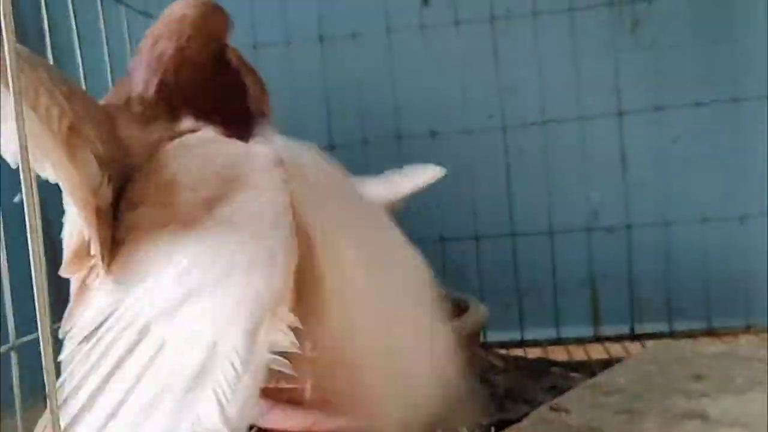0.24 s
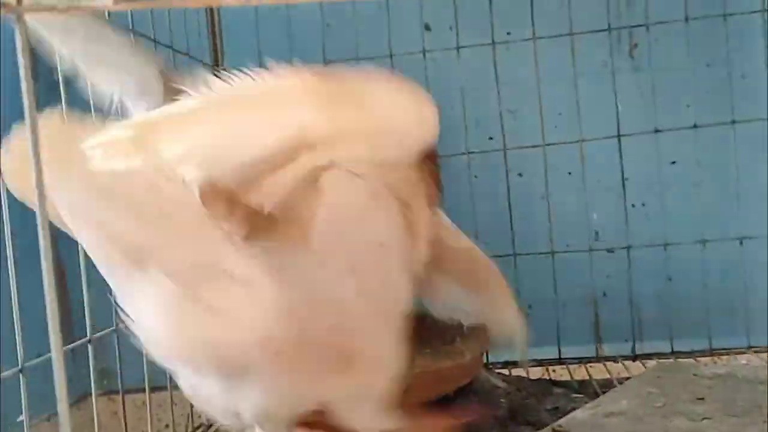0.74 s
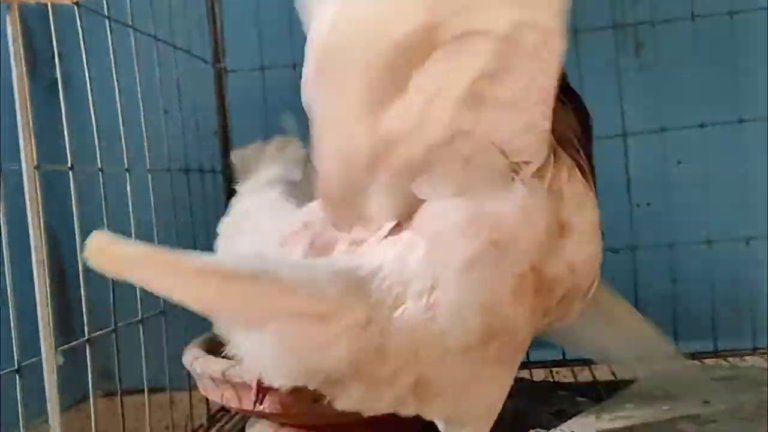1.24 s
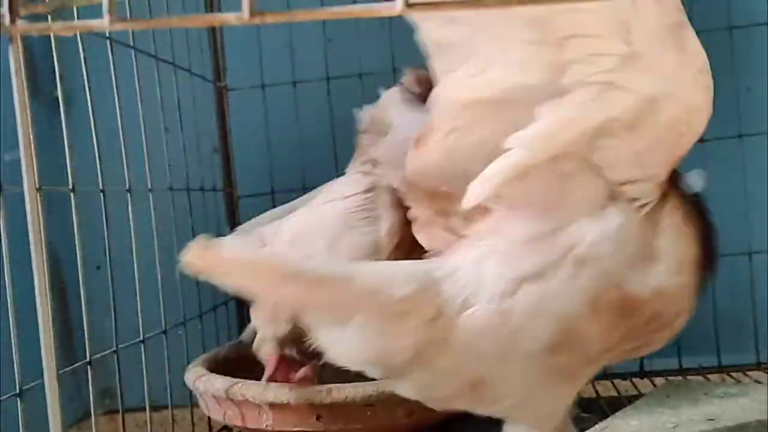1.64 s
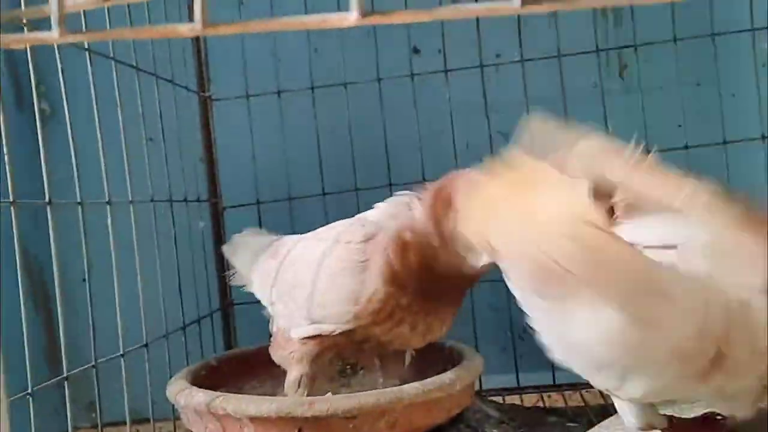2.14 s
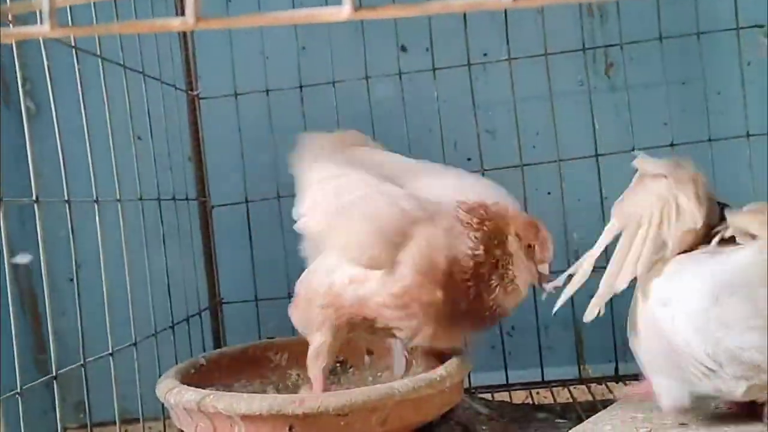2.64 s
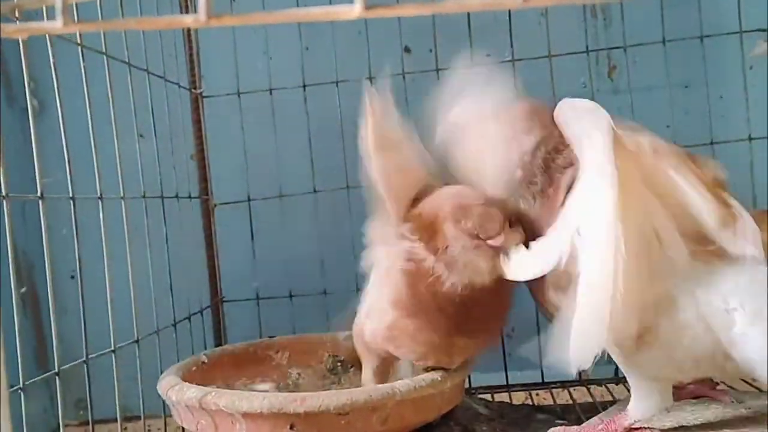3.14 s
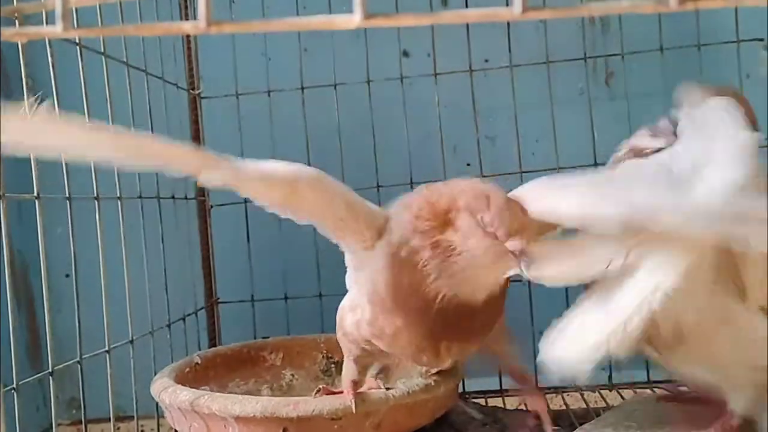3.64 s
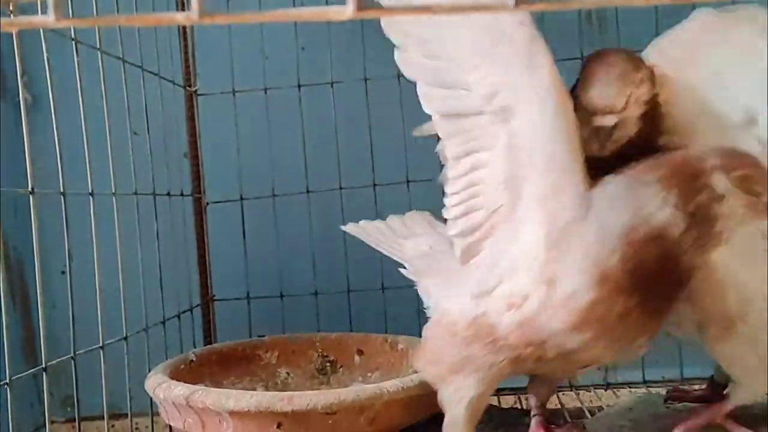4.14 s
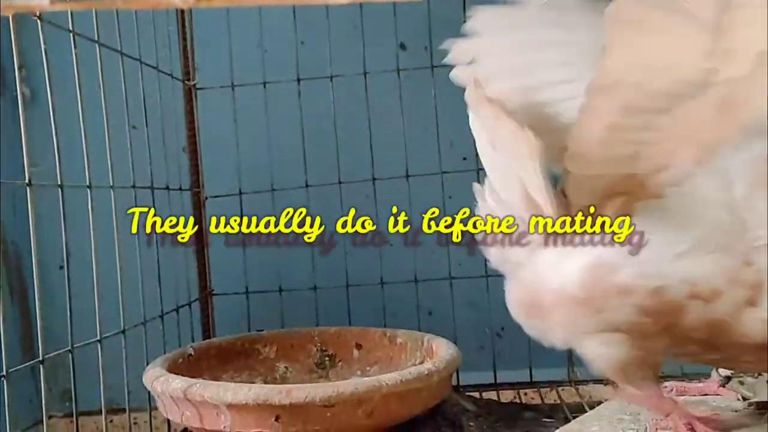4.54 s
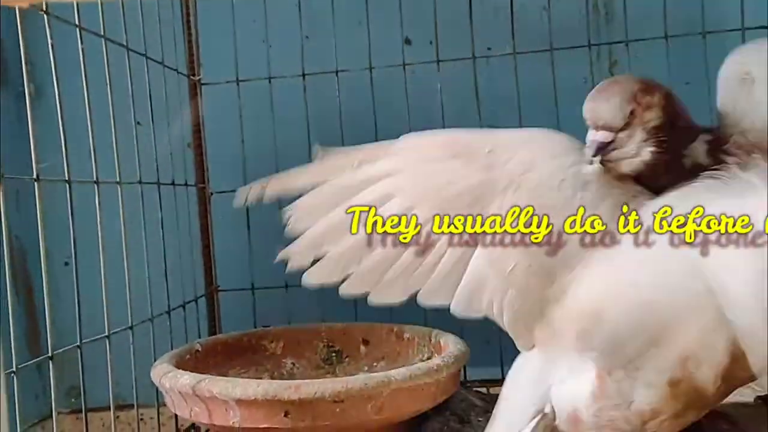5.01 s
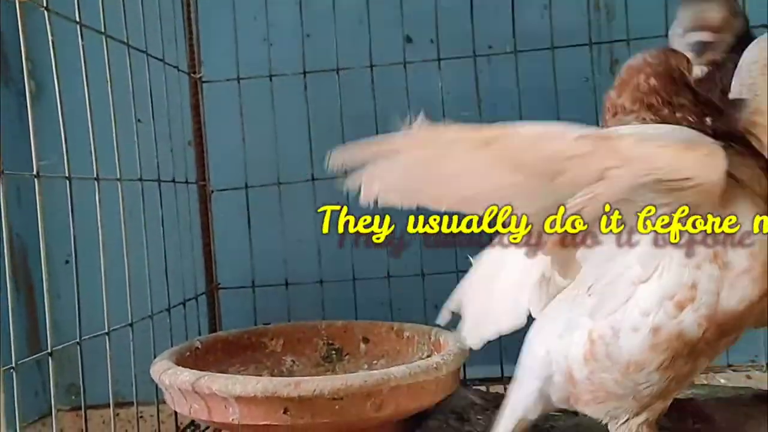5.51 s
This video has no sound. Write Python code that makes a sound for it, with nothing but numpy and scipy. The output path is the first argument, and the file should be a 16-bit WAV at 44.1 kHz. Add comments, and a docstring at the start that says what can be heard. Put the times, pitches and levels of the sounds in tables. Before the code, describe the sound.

Feathers whoosh, crack and rattle as fighting pigeons give low grunting coos and throaty pulses in a murmuring pigeon loft.

```python
"""In a pigeon loft, at a wire cage: two pigeons scuffle, with a small stereo microphone that cuts the bass.
Foreground: both coo in throbbing near-sine notes, with short two-tone throat pulses between and over them.
Wings swish, slap and rattle in shaped noise, scrapes ring the wire, and narrow noise squeaks.
Around them the loft murmurs in short random coos and banded noise; far off a thin whistle comes and goes.
Feedback delays give the room, and slaps puff low noise on the microphone ports."""
import sys
import numpy as np
from scipy import signal
from scipy.io import wavfile

SR = 44100
rng = np.random.default_rng(int(sys.argv[2]) if len(sys.argv) > 2 else 0)


def waveform_to_disk(signal):
    """Save audio, clipped to [-1, 1], as 16-bit WAV at the path in sys.argv[1]."""
    frames = np.transpose(np.atleast_2d(signal))
    scaled = np.clip(frames, -1, 1) * 32767
    samples = np.round(scaled).astype(np.int16)
    wavfile.write(sys.argv[1], SR, samples)


N = 254236
TIME = np.arange(N) / SR

# Coo notes of each bird; pitch glides fast at first, level slides evenly in dB:
# (start t/s, length t/s, start f/Hz, end f/Hz, start level/dB, end level/dB)
LOW_BIRD_NOTES = [(0.3, 0.13, 341, 335.3, -41.5, -41), (0.735, 0.17, 352.9, 291.6, -34, -35.5),
                  (0.95, 0.25, 325.2, 327, -42, -32), (1.16, .23, 344.4, 343.4, -36, -37.5),
                  (2.17, 0.13, 352.6, 296, -26.5, -24), (2.375, 0.4, 296, 336.3, -31, -40),
                  (3.52, 0.13, 367.7, 370.8, -43, -43.5), (3.89, 0.091, 341.2, 337.2, -35, -33.5),
                  (4.0, 0.15, 359.2, 350.6, -37, -35.5), (4.19, 0.1, 331.7, 345.7, -29.5, -36.5),
                  (4.585, 0.087, 356, 347, -28.5, -34), (4.69, 0.031, 306.5, 294, -32, -27.5),
                  (4.75, 0.097, 340, 346.3, -33.5, -31.5), (4.965, 0.081, 356.9, 341.6, -28, -31),
                  (5.075, 0.085, 325.3, 327.6, -36.5, -38.5), (5.42, 0.27, 361, 341.7, -40, -35.5)]
HIGH_BIRD_NOTES = [(0, 0.064, 415.4, 395.5, -38, -42), (1.11, 0.028, 509.4, 498, -43.5, -34),
                   (2.38, .1, 448.6, 420, -38, -41.5), (2.62, 0.19, 357, 436, -27.5, -53),
                   (3.715, 0.14, 426.6, 414.6, -35, -35.5), (4.025, 0.12, 431.8, 411, -30.5, -37),
                   (4.94, 0.18, 499.2, 390, -33, -36), (5.14, 0.087, 395, 455, -35.5, -32.5),
                   (5.27, .09, 432, 420.7, -50, -33.5), (5.44, .13, 419.8, 413.4, -34.5, -34.5)]
# Sudden swells of each bird's throat: (t/s, peak level/dB)
LOW_BIRD_SWELLS = [(0.943, -30), (1.007, -29), (1.066, -24), (1.152, -26.5), (2.248, -20), (2.505, -22),
                   (2.619, -26), (4.639, -25), (5.02, -26.5)]
HIGH_BIRD_SWELLS = [(4.13, -33), (4.971, -27.5), (5.284, -30.5)]
# How broken the low bird's note is: (t/s, roughness [0-1])
LOW_BIRD_ROUGHNESS = [(2.1, .45), (2.16, .15), (2.33, .15), (2.37, .7), (4.5, .45), (4.6, .35), (4.9, .45)]
# Short two-tone throat pulses, some between coos and some over them:
# (t/s, peak level/dB of the lower tone, lower tone f/Hz, upper tone level/dB against the lower)
THROAT_PULSES = [(1.213, -28, 296, -2), (1.457, -36.5, 315.4, 7), (1.65, -32, 297.7, 0),
                 (1.706, -22.5, 307, -4), (1.778, -25.5, 301, 5), (1.857, -26.5, 306.5, 6),
                 (1.959, -25.5, 308, -10), (2.012, -31, 349, 0.5), (3.199, -28, 338, -13),
                 (3.302, -29.5, 353, -9), (3.665, -29.5, 333, -8), (5.488, -32, 317, 10),
                 (5.65, -33.5, 318.2, 6.5)]
# Wing strokes sweeping the air: (peak t/s, peak level/dB, swell time constant t/s, fade time constant t/s)
WING_STROKES = [(0.041, -41.5, 0.009, 0.09), (0.12, -42, 0.088, 0.045), (0.27, -48, 0.05, 0.13),
                (0.421, -37, 0.014, 0.089), (0.743, -42, 0.041, 0.062), (0.898, -51, 0.095, 0.11),
                (1.077, -46.5, 0.011, 0.069), (1.327, -42.5, 0.031, 0.096), (1.88, -53.5, 0.23, 0.079),
                (2.392, -40.5, 0.037, 0.077), (2.917, -40, 0.071, 0.038), (3.083, -47.5, 0.006, 0.19),
                (3.179, -46, 0.016, 0.25), (3.26, -45, .005, 0.054), (3.362, -45.5, 0.012, 0.079),
                (3.637, -42, 0.022, 0.032), (3.79, -44.5, 0.015, 0.16), (4.19, -51, 0.0084, 0.12),
                (4.3, -43.5, 0.029, 0.1), (4.416, -46.5, 0.029, 0.11), (4.552, -40, 0.0084, 0.088),
                (4.774, -53, 0.06, 0.34), (5.044, -46, 0.02, 0.05)]
# Wing slaps: (t/s, crack level/dB, body resonance f/Hz, body level/dB)
WING_SLAPS = [(0.0345, -37.5, 1380, -45), (0.415, -42, 1870, -43.5), (0.5, -44, 1536, -33),
              (0.7368, -47, 1093, -34.5), (0.8945, -41, 754, -61), (1.075, -40.5, 1840, -42.5),
              (1.37, -41, 1734, -37.5), (1.4536, -47, 1230, -48.5), (1.573, -41, 1012, -43),
              (2.071, -36.5, 2600, -48), (2.135, -46, 817, -38), (2.1871, -64, 1480, -43),
              (2.3443, -44, 2179, -45.5), (2.385, -41.5, 825, -48), (2.5823, -32.5, 1760, -38.5),
              (2.7156, -40.5, 830, -37.5), (3.1775, -39.5, 673, -26), (3.202, -45, 1840, -36),
              (3.255, -36.5, 854, -37), (3.3559, -39, 1123, -34), (3.426, -35.5, 1770, -40),
              (3.441, -39, 538, -33.5), (3.791, -38, 2710, -42), (3.9386, -36, 1994, -46.5),
              (4.411, -43, 1543, -38.5), (4.5531, -37, 2880, -42), (5.5765, -38, 1683, -39.5),
              (5.671, -41.5, 839, -44)]
# Tone colour of the feather noise: (f/Hz, relative level/dB per Hz)
FEATHER_SPECTRUM = [(400, -49), (700, 1), (2000, -1.5), (4800, -6.5), (5900, -6), (6850, 3), (10000, -13),
                    (16000, -7.5)]
# Modes of the cage wire: (f/Hz, level/dB)
WIRE_MODES = [(3900, -6), (5250, -8), (6620, 1), (7350, -4)]
# A claw or quill drags over the wire: (t/s, peak level/dB of the driving noise)
WIRE_DRAGS = [(0.242, -43.5), (1.45, -47)]
# Narrow squeaks in the scuffle: (start t/s, fall time t/s, f/Hz, level/dB before fading)
SCUFFLE_SQUEAKS = [(0.762, 0.043, 3120, -50), (3.292, 0.022, 1600, -35.5), (4.071, 0.022, 2330, -45.5),
                   (4.551, 0.037, 3080, -40), (5.309, 0.16, 741, -43)]
# Tone colour of the loft murmur: (f/Hz, relative level/dB per Hz)
LOFT_SPECTRUM = [(200, -34), (280, -22.5), (370, 7.5), (660, -8), (1000, -13), (1400, -17), (3900, -29),
                 (4900, -41), (7000, -32), (10000, -41.5), (16000, -45)]
# Far thin whistle: (start t/s, end t/s, f/Hz)
FAR_WHISTLES = [(1, 1.309, 3940), (2.177, 2.543, 4075), (2.952, 3.158, 3970), (3.952, 4.452, 3860),
                (5.251, 5.658, 3938)]
# Stereo image of feathers and loft: (f/Hz, left-right correlation) and (f/Hz, left minus right level/dB)
STEREO_LIKENESS = [(300, 0.93), (700, 0.25), (1500, 0.022), (8000, 0.034)]
STEREO_LEANING = [(400, -1.5), (1000, -1.1), (4000, 3.5), (13000, 0.5)]

ATTACK_S, RELEASE_S = 0.02503, 0.065   # a note fades in ahead of its start and out after its end
FALL_S, CLIMB_S = .045, 0.046   # time constants of a falling and of a climbing glide
BODY_FALL_S, CRACK_FALL_S = .016, .005
SNAP_LOW_HZ, SNAP_HIGH_HZ, SNAP_DB = 590, 6000, -7.5   # flat noise in a crack, against its feather noise
BARBS_PER_S, BARB_FALL_S, BARB_DB = 220, .004, -8   # feather barbs catching during a stroke
MEDIAN_QUILLS_PER_S, QUILL_DB = 220, -11   # quills knocking together, against the stroke level
WIRE_T60_S = 0.041
LOFT_DB = -39.5
ROOM_T60_S, WALL_CUT_HZ = 0.57, 7100   # decay in the bass; treble loss on every round
BASS_STOP_HZ, TOP_STOP_HZ = 229.4, 16500   # edges of the stop bands
PUFF_DB = 9   # added to twice the crack dB: a puff grows as the square of its crack


def coo(pitch_hz, level, rough, throb_rate, swell=0, second_db=-28):
    """A closed-beak note: nearly a sine; when rough, the swollen throat flutters and the pitch wavers."""
    phase = 2 * np.pi * np.cumsum(pitch_hz + rough * 18 * drift(35)) / SR
    throat = np.sin(2 * np.pi * np.cumsum(throb_rate * amp(2.5 * drift(6))) / SR)
    throb = (1 + rough * (throat + .5 * drift(40))) / np.sqrt(1 + .75 * rough ** 2)   # keeps the power even
    tone = np.sin(phase) + amp(second_db) * np.sin(2 * phase)
    return np.sqrt(2) * np.hypot(level * throb, swell) * tone


def notes(rows):
    """Pitch and level of a bird over time: exponential glides, silence between notes."""
    pitch_hz, level = np.full(N, float(rows[0][3])), np.zeros(N)
    for start, length, start_hz, end_hz, start_db, end_db in rows:
        t = TIME - start
        part = np.clip(t / length, 0, 1)
        gate = np.clip(np.minimum(1 + t / ATTACK_S, 1 + (length - t) / RELEASE_S), 0, 1) ** 2
        glide_s = FALL_S if end_hz < start_hz else CLIMB_S
        glide = end_hz + (start_hz - end_hz) * np.exp(-part * length / glide_s)
        pitch_hz = np.where(t > -ATTACK_S, glide, pitch_hz)
        level = np.maximum(level, gate * amp(start_db + (end_db - start_db) * part))
    return pitch_hz, level


def swells(rows):
    """Extra level of a bird: the throat swells quickly and falls back."""
    out = np.zeros(N)
    for s, peak_db in rows:
        add(out, s, amp(peak_db) * bump(rise_s=0.006, fall_s=0.024))
    return out


def throat_pulses(upper_ratio=1.28, crest_s=0.007):
    """Each pulse is a few cycles of two throat tones that swell and die."""
    out, shape = np.zeros(N), bump(rise_s=.007, fall_s=.014)
    for s, peak_db, hz, upper_db in THROAT_PULSES:
        phase = 2 * np.pi * hz * (TIME[:len(shape)] - crest_s)
        tones = np.sin(phase) + amp(upper_db) * np.sin(upper_ratio * phase)
        add(out, s, amp(peak_db) * shape * tones)
    return out


def wings(feathers):
    """Strokes sweep noise through rustling feathers; slaps add a noise crack and a resonant body."""
    crack, body = np.zeros(N), np.zeros((2, N))
    for s, crack_db, hz, body_db in WING_SLAPS:
        add(crack, s, amp(crack_db) * bump(rise_s=0.00021, fall_s=CRACK_FALL_S))
        add(body, s, amp(body_db) * slap_body(hz))
    snap = bandpass(1, SNAP_LOW_HZ, SNAP_HIGH_HZ, rng.standard_normal((2, N)))
    air = swish()
    feather_noise = feathers * np.hypot(air * rustle(), crack)
    return feather_noise + amp(SNAP_DB) * rms_one(snap) * crack + body + air * quill_knocks()


def slap_body(hz, sharpness=3.5):
    """A sine knock plus crackling quills, in and around one resonance of the wing."""
    shape = bump(rise_s=0.0012, fall_s=BODY_FALL_S)
    quills = rng.standard_normal((2, len(shape))) * rng.exponential(1, len(shape)) ** 1.5
    knock = .9 * np.sin(2 * np.pi * hz * TIME[:len(shape)])
    ringing = rms_one(resonate_twice(hz, sharpness, quills))
    rattle = rms_one(bandpass(2, hz / 3.1, 1.98 * hz, quills[::-1]))   # sides swapped
    return (.55 * ringing + .55 * rattle + knock * shape) * shape


def swish():
    """Level of the feather noise: the strokes add in power."""
    power = np.zeros(N)
    for s, peak_db, swell_s, fade_s in WING_STROKES:
        away = np.maximum((s - TIME) / swell_s, (TIME - s) / fade_s)
        power += amp(2 * peak_db) * np.exp(-2 * away)
    return np.sqrt(power)


def rustle():
    """Grain of the feather noise: random barb catches, each dying away, over a quick flicker."""
    catches = (rng.random(N) < BARBS_PER_S / SR) * np.minimum(rng.exponential(1, N), 3)
    barbs = signal.lfilter([1], [1, -np.exp(-1 / (BARB_FALL_S * SR))], catches + 1e-18)
    return rms_one((1 + amp(BARB_DB) * barbs) * amp(1.2 * drift(30) + 1.5 * drift(200)))


def quill_knocks():
    """Uneven knocks, dealt to short resonances across the middle range, alternately left and right."""
    struck = rng.random(N) < MEDIAN_QUILLS_PER_S * amp(5 * drift(15)) / SR
    sizes = struck * amp(4 * np.minimum(rng.exponential(1, N), 4))
    dealt, out = rng.integers(0, 8, N), 0
    for k, hz in enumerate(np.geomspace(800, 3200, 8)):
        r = amp(-60 * hz / (16 * SR))   # down 60 dB in 16 cycles
        turn = 2 * np.pi * hz / SR
        ring = signal.lfilter([np.sin(turn)], [1, -2 * r * np.cos(turn), r * r], sizes * (dealt == k) + 1e-18)
        out = out + panned(ring, 8 * (-1) ** k)
    return amp(QUILL_DB) * rms_one(out)


def wire():
    """Each scrape is a burst of noise into the modes of the wire."""
    scrape, shape = np.full((2, N), 1e-18), bump(rise_s=0.0059, fall_s=0.01)
    for s, peak_db in WIRE_DRAGS:
        add(scrape, s, amp(peak_db) * shape * rng.standard_normal((2, len(shape))))
    r, out = amp(-60 / (WIRE_T60_S * SR)), 0
    for hz, db in WIRE_MODES:
        poles = [1, -2 * r * np.cos(2 * np.pi * hz / SR), r * r]
        out = out + amp(db) * signal.lfilter([np.sqrt(1 - r * r)], poles, scrape)
    return out


def squeaks(width_hz=300):
    """Broken narrow noise around each pitch, faded in and out."""
    out = np.zeros((2, N))
    for start, fall_s, hz, level_db in SCUFFLE_SQUEAKS:
        shape = bump(rise_s=0.0045, fall_s=fall_s)
        size = len(shape)
        hiss = resonate_twice(hz, hz / width_hz, rng.standard_normal((2, size)))
        broken = rms_one(hiss * amp(5 * drift(100))[:size])
        add(out, start, amp(level_db) * broken * shape * signal.windows.tukey(size, .5) ** .5)
    return out


def flock(level_db=-48, count=260):
    """Other birds coo at random: short gliding, throbbing notes, each from its own side."""
    out = np.zeros((2, N))
    for s, pitch, length, glide, side, rate in rng.random((count, 6)):
        t = TIME[:round((.08 + .2 * length) * SR)]
        hz = 290 * amp(6.5 * pitch ** 1.5) * (1 + 0.303 * (glide - .5) * t / t[-1])
        throb = 1 + 1.56 * np.sin(2 * np.pi * (14 + 30 * rate) * t)
        note = np.sin(2 * np.pi * np.cumsum(hz) / SR) * np.hanning(len(t)) * throb
        add(out, s * N / SR, panned(note * amp(-9 * pitch), 14 * (side - .5)))   # higher notes are softer
    return amp(level_db) * rms_one(out)


def room(x):
    """Six feedback delays a side, duller on every round, stepped block by block."""
    out, dull = np.zeros((2, N)), np.exp(-2 * np.pi * WALL_CUT_HZ / SR)
    for k, lag in enumerate((np.geomspace(.0171, .0487, 12) * SR).astype(int)):
        loop, gain, state = x[k % 2].copy(), amp(-60 * lag / SR / ROOM_T60_S), [0.]
        for i in range(lag, N, lag):
            back, state = signal.lfilter([gain * (1 - dull)], [1, -dull], loop[i - lag:i], zi=state)
            loop[i:i + lag] += back[:N - i]
        out[k % 2] += (loop - x[k % 2]) * (-1) ** (k // 2)
    return out


def banded_noise(spectrum, patchy_db, patch_rate):
    """Third-octave bands of stereo noise, each with its own level, flicker, likeness and leaning; rms 1."""
    out, edges = 0, 200 * 2 ** np.arange(0, 6.5, 1 / 3)
    white = rng.standard_normal((2, 2, N))      # neighbouring bands get unrelated noise
    for k, (low, high) in enumerate(zip(edges, edges[1:])):
        mid, side = bandpass(2, low, high, white[k % 2])
        hz = np.sqrt(low * high)
        alike = np.clip(at_hz(STEREO_LIKENESS, hz), -1, 1)
        level = amp(at_hz(spectrum, hz) + patchy_db * drift(patch_rate))
        stereo = np.sqrt(1 + alike) * mid + np.sqrt(1 - alike) * side * [[1], [-1]]
        out = out + panned(level, at_hz(STEREO_LEANING, hz)) * stereo
    return rms_one(out)


def whistles(width_hz=160, level_db=-64.0):
    """Narrow noise around each pitch, faded in and out."""
    out = np.zeros((2, N))
    for start, end, hz in FAR_WHISTLES:
        size = round((end - start) * SR)
        hiss = resonate_twice(hz, hz / width_hz, rng.standard_normal((2, size)))
        add(out, start, amp(level_db) * rms_one(hiss) * signal.windows.tukey(size, .5))
    return out


def puffs(top_hz=200, apart=0.65, width_s=.017):
    """Lumps of low noise, mostly shared by both microphone ports, blown by each slap."""
    shape = np.zeros(N)
    for s, crack_db, *_ in WING_SLAPS:
        shape += amp(PUFF_DB + 2 * crack_db) * np.exp(-.5 * ((TIME - s) / width_s) ** 2)
    white = rng.standard_normal((3, N))
    low_pass = signal.butter(2, top_hz, fs=SR, output="sos")
    air = signal.sosfilt(low_pass, white[0] + apart * white[1:])
    return rms_one(air) * (shape + amp(-97))   # a faint steady floor lies beneath


def amp(db):
    """Amplitude factor of a level in dB."""
    return 10 ** (np.asarray(db) / 20)


def rms_one(x):
    """Scale to rms 1."""
    return x / np.sqrt(np.mean(x ** 2) + 1e-20)


def at_hz(points, hz):
    """Read a frequency table, straight over log frequency."""
    return np.interp(np.log(hz), np.log(np.array(points)[:, 0]), np.array(points)[:, 1])


def drift(rate):
    """Noise at every 40th sample through a double one-pole low-pass, run in; spread 1."""
    r = np.exp(-80 * np.pi * rate / SR)
    slow = signal.lfilter([1], [1, -2 * r, r * r], rng.standard_normal(N // 40 + 2002))[2000:]
    return np.interp(np.arange(N) / 40, np.arange(len(slow)), rms_one(slow))


def bump(rise_s, fall_s):
    """A swell of height 1, an eighth of a second long."""
    t = TIME[:SR // 8]
    shape = (1 - np.exp(-(t / rise_s) ** 2)) * np.exp(-t / fall_s)
    return shape / shape.max()


def bandpass(order, low_hz, high_hz, x):
    """Keep the band between two frequencies."""
    return signal.sosfilt(signal.butter(order, [low_hz, high_hz], "band", fs=SR, output="sos"), x)


def resonate_twice(hz, sharpness, x):
    """Two equal resonances in a row."""
    peak = signal.iirpeak(hz, sharpness, fs=SR)
    return signal.lfilter(*peak, signal.lfilter(*peak, x))


def panned(x, pan_db):
    """Place left and right by level difference; positive is left."""
    return x * amp([[pan_db / 2], [-pan_db / 2]])


def add(out, s, sound):
    """Mix a short sound in from time s."""
    i = round(s * SR)
    out[..., i:i + sound.shape[-1]] += sound[..., :N - i]


def scene():
    """Mix the cage, its room, the loft and the whistle, then cut the bass at the microphone."""
    low_hz, low_level = notes(LOW_BIRD_NOTES)
    high_hz, high_level = notes(HIGH_BIRD_NOTES)
    rough_s, rough = np.transpose(LOW_BIRD_ROUGHNESS)
    low_rough = np.clip(np.interp(TIME, rough_s, rough), 0, 1)
    low = coo(low_hz, low_level, low_rough, throb_rate=28, swell=swells(LOW_BIRD_SWELLS))
    high = coo(high_hz, high_level, rough=.6, throb_rate=33, swell=swells(HIGH_BIRD_SWELLS))
    birds = panned(low + throat_pulses(), -1.3) + panned(high, -5.0)
    feathers = banded_noise(FEATHER_SPECTRUM, patchy_db=4.0, patch_rate=25.0)
    flaps = wings(feathers) + wire() + squeaks()
    others = flock()
    room_feed = amp(-13.5) * birds + amp(-13) * flaps + amp(-12.5) * others
    loft = amp(LOFT_DB) * banded_noise(LOFT_SPECTRUM, patchy_db=2.8, patch_rate=7)
    sound = birds + flaps + others + room(room_feed) + loft + whistles()
    # the microphone cuts sound steeply in the bass; air blown on its ports leaks through
    bass_cut = signal.cheby2(10, 35, BASS_STOP_HZ, "high", fs=SR, output="sos")
    return signal.sosfilt(bass_cut, sound) + puffs()


def record(dry):
    """The top is cut steeply."""
    return signal.sosfilt(signal.cheby2(18, 50, TOP_STOP_HZ, fs=SR, output="sos"), dry)


dry = scene()
out = record(dry)
waveform_to_disk(out)
```